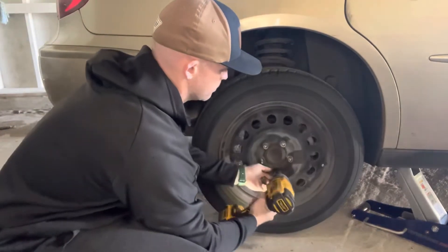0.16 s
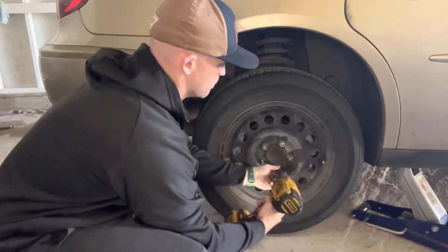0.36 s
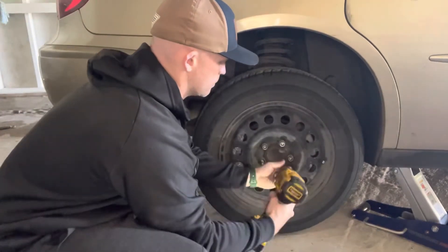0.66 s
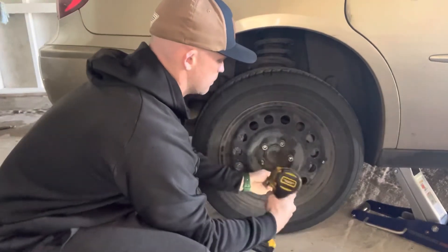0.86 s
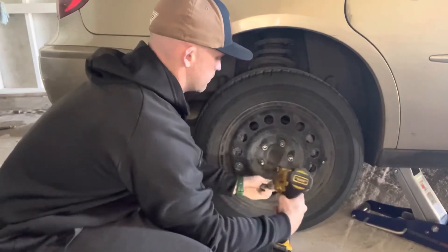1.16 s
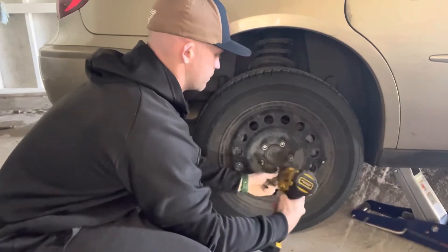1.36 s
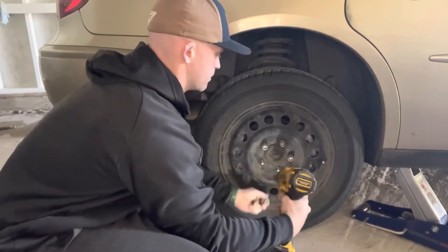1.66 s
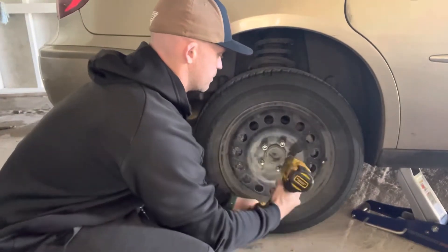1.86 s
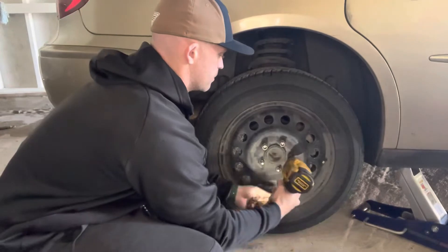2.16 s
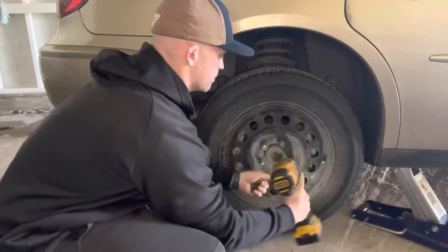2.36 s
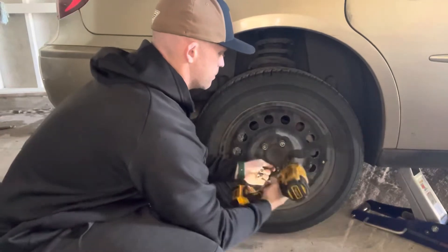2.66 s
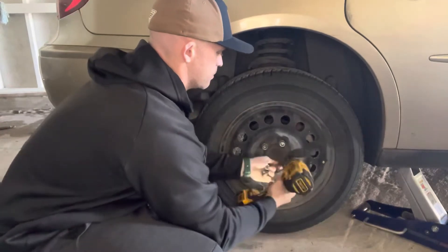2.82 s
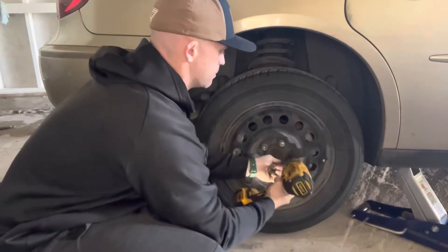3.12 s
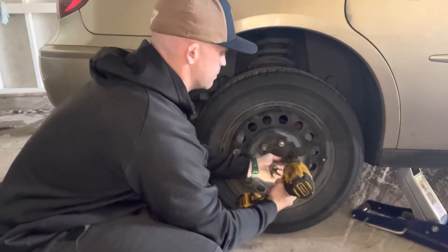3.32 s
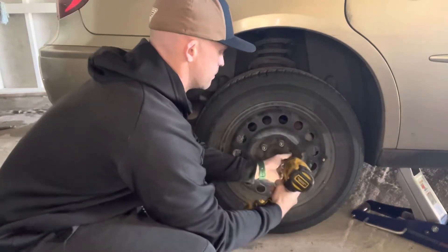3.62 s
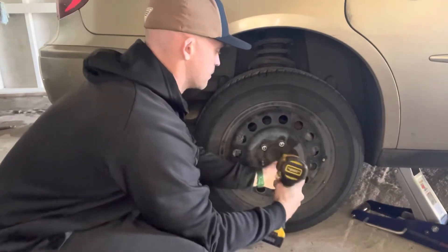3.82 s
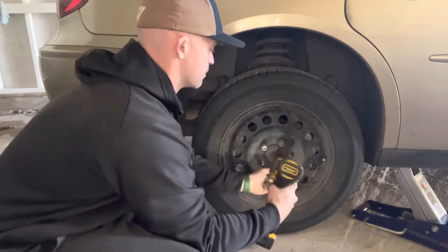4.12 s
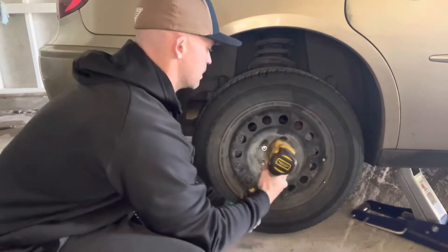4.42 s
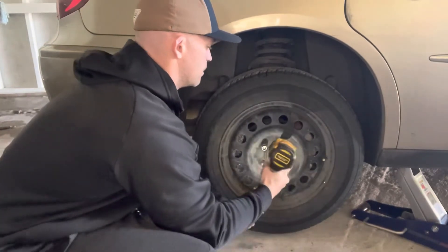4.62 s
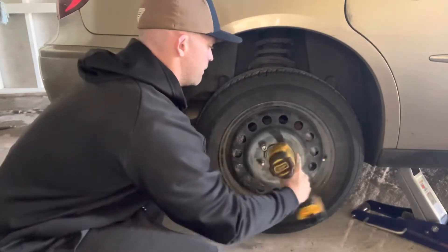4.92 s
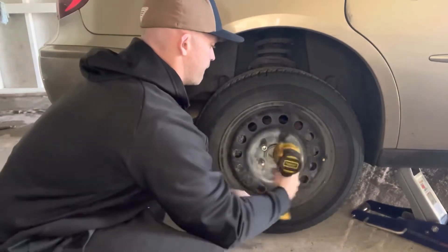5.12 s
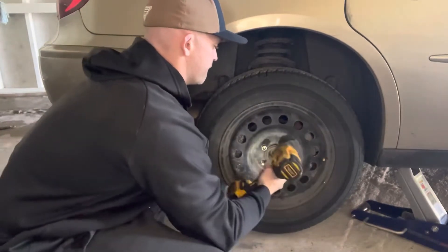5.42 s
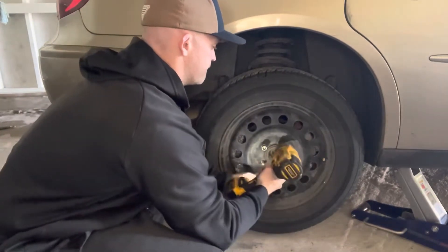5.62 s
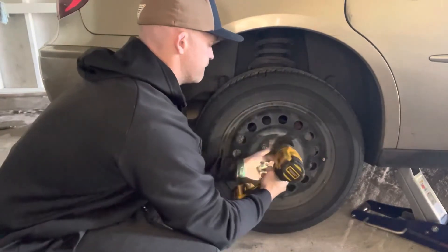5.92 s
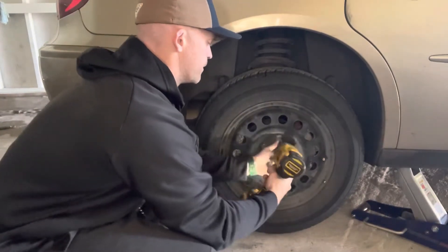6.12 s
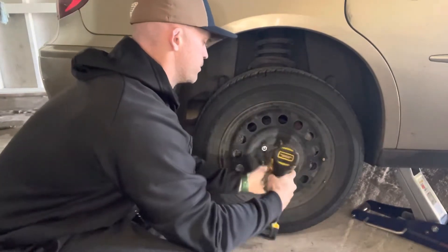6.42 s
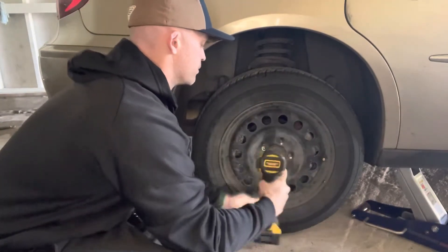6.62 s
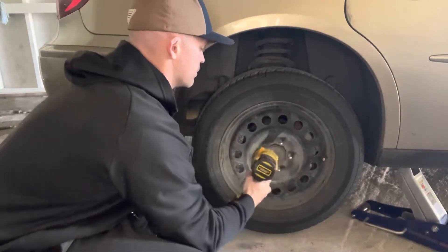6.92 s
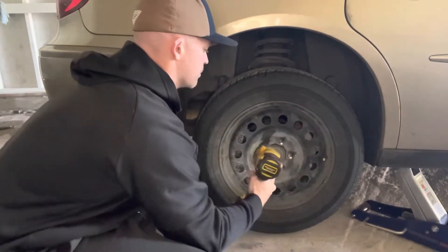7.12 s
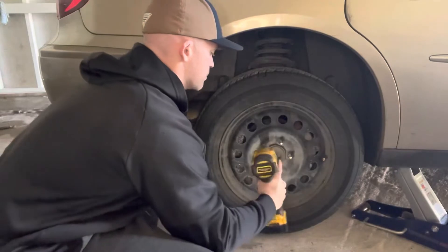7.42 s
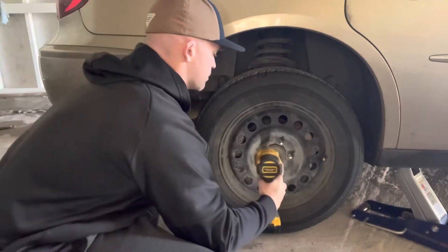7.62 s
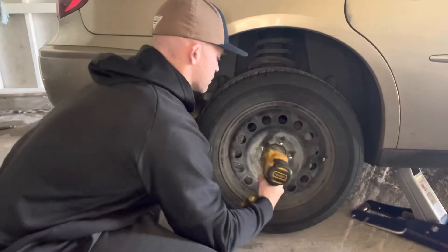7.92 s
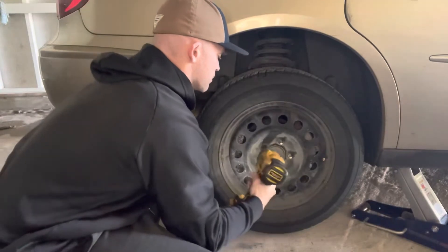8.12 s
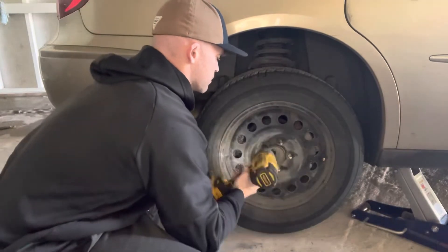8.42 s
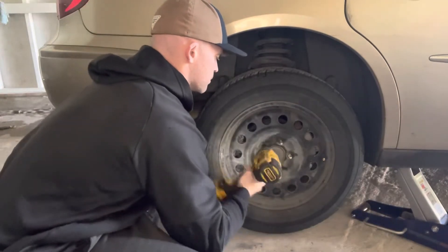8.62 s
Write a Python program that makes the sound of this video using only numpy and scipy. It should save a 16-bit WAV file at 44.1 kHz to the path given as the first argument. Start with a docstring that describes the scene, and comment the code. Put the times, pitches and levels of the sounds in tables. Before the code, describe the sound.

A freed nut rattles in a spinning socket as the motor whines down, then two hammering impact-wrench bursts break up clinks and knocks on a steel wheel.

```python
"""A freed nut rattles in a spinning socket, then the motor whines down: a cordless impact wrench in an open garage.
Nuts clink and the socket knocks on a steel car wheel; two bursts of hammer blows each spin another nut free.
Noise bursts make the contacts, damped sines the ringing steel, speed-driven noise and tones the motor.
Hands rub, scrapes and squeaks fill the pauses; a distant engine hums over low rumble and still air."""
import sys
import numpy as np
from scipy import signal
from scipy.fft import rfft, irfft, next_fast_len
from scipy.io import wavfile

SR = 44100
rng = np.random.default_rng(int(sys.argv[2]) if len(sys.argv) > 2 else 0)


def waveform_to_disk(signal):
    """Save audio, clipped to [-1, 1], as 16-bit WAV at the path in sys.argv[1]."""
    frames = np.transpose(np.atleast_2d(signal))
    scaled = np.clip(frames, -1, 1) * 32767
    samples = np.round(scaled).astype(np.int16)
    wavfile.write(sys.argv[1], SR, samples)


N = 386757
TIME = np.arange(N) / SR

# All levels are relative: filters, layer gains and echoes follow. Spectra: freq_hz, density_db_per_hz

# trigger pulls: pulled_s, nut_free_s, released_s, motor_stopped_s
TRIGGER_RUNS = [(-.7, -.2, .21, .58), (2.79, 3.15, 3.5, 3.85), (5.305, 5.67, 5.99, 6.33)]
# speeds as shares of full speed; run-up is a time constant
LOADED_SPEED, START_S, RUN_UP_S = 0.51, 0.028, .075

# spinning nut: spectrum
SPIN_SPECTRUM = [(100, 6), (200, 3), (420, 0), (520, 1), (720, 3.5), (950, 1), (1450, -3), (2200, -4.5),
                 (2800, -4), (3500, -10.5), (6600, 0.5), (8200, -8), (10500, -7), (13000, -7.5),
                 (14400, -16), (16000, -31.5)]
# tool housing and socket resonances: freq_hz, width_hz, level_db
HOUSING_MODES = [(724, 22, 0), (1080, 140, -10.5), (1450, 61, 0.5), (1880, 35, -9.5), (2525, 100, -1.5),
                 (3440, 45, -7), (4150, 240, -0.5), (5540, 240, -14), (6910, 180, -8.5)]
# levels at full speed; powers of speed that amplitude follows
RATTLE_DB, RATTLE_POWER = -31, 4.1
HISS_DB, HISS_POWER = -35, 2.07
RATTLE_FADE_DB_PER_S = 24.5  # the nut runs off its thread

# gear and fan whirr: spectrum
GEAR_SPECTRUM = [(200, -15.5), (700, -13.5), (1400, -8), (2200, -6.5), (2900, -1), (3500, 0), (4300, -9),
                 (6000, -9), (8000, -15), (11000, -19), (15000, -42)]
GEARS_DB, GEARS_POWER = -37.5, .95
# gear whine overtones: multiple, level_db
WHINE_OVERTONES = [(1, -8), (2, -2), (3, -2.5), (4, -1)]
MESH_HZ, MESH_JITTER_HZ = 1399, 20  # tooth rate at full speed, and its unsteadiness
WHINE_DB, WHINE_POWER = -41.5, .85  # overtone k follows speed to k times this power

# distant engine: time_s, level_db
ENGINE_LEVEL = [(0.0, -56), (1.45, -60), (1.7, -73.5), (2.05, -61.5), (2.49, -62), (2.71, -52.5),
                (3.3, -51), (3.76, -58), (4.78, -42), (5.89, -47.5), (6.32, -43), (6.94, -47.5),
                (7.45, -39), (7.64, -47), (7.84, -46.5), (8.04, -40), (8.77, -33.5)]
ENGINE_HZ, ENGINE_HZ_PER_DB = 83.2, 0.35  # at mean level; faster when louder
# low rumble: spectrum
RUMBLE_SPECTRUM = [(20, -13), (38, -0.5), (55, 15), (75, 13.5), (110, 5), (160, -12.5), (250, -12),
                   (500, -59.5)]
# at rest, with tool at full speed, relative to hand rubbing, relative to engine
RUMBLE_REST_DB, RUMBLE_TOOL_DB, RUMBLE_MOVE_DB, RUMBLE_ENGINE_DB = -61, -42.5, 10, -2.5
RUMBLE_LUMPY_DB = 3
# still air: spectrum
AIR_SPECTRUM = [(88, -33), (150, -1.5), (254, -11.5), (1560, -30.5), (2500, -32), (5570, -43.5),
                (8230, -48.5), (12700, -46.5), (16000, -63)]
AIR_DB = -64.5

# hands shifting the tool and picking out nuts: start_s, end_s, level_db
HAND_MOVES = [(1.08, 1.15, -76), (1.42, 1.52, -67), (1.95, 2.35, -62.5), (2.55, 2.76, -47.5),
              (3.85, 4.05, -64), (4.55, 4.83, -61), (4.98, 5.1, -51.5), (5.17, 5.27, -51), (6.28, 6.4, -66),
              (7.45, 7.6, -65.5), (7.72, 7.77, -54.5), (8.08, 8.77, -53.5)]
MOVE_FADE_S, RESTING_DB = 0.11, -75
# cloth and fingers: spectrum
CLOTH_SPECTRUM = [(200, -3.5), (700, 11), (1200, 2), (2200, -0.5), (3500, -4.5), (6000, -19), (8000, -22),
                  (12500, -20.5), (15000, -39.5)]
TAP_COUNT, TAP_DB = 110, -4  # socket taps in the whole scene; level relative to handling

# freed nut clinking in socket or hand: time_s, level_db
NUT_CLINKS = [(0.0287, -22.5), (0.1005, -22.5), (0.2837, -21.5), (0.3366, -22), (0.527, -40), (0.792, -63),
              (1.819, -60), (1.869, -47), (1.903, -34), (2.009, -49), (2.284, -37), (2.361, -48),
              (2.427, -49.5), (2.546, -31.5), (2.64, -33.5), (3.5508, -18.5), (3.5808, -17), (3.6538, -28),
              (3.666, -24), (3.7697, -41), (3.859, -40), (4.8542, -37), (5.7162, -24), (6.0477, -17.5),
              (6.053, -31), (6.063, -34), (6.1483, -25.5), (6.174, -32), (6.202, -34), (6.268, -43),
              (6.42, -59), (8.084, -45.5), (8.214, -39.5), (8.739, -16.5)]
# clink contact: spectrum
CLINK_SPECTRUM = [(600, -11), (2000, -8), (4500, -5.5), (6500, -9.5), (8000, -8), (10200, -3.5),
                  (12500, -16), (15500, -16.5)]
# loose nut modes: freq_hz, level_db, t60_s
NUT_MODES = [(9790, 1.5, 0.045), (10200, -5.5, 0.033), (11000, -4, 0.034), (11450, -6.5, 0.12),
             (13100, -7, 0.061)]

# socket and nuts on wheel: time_s, clack_db, thud_db, wheel_ring_db, steel_db
WHEEL_KNOCKS = [(0.183, -26, -41.5, -30, -37), (0.625, -48, -60, -71, -60),
                (0.6622, -48.5, -71, -74, -59.5), (1.085, -58, -70, -75, -72), (1.125, -59, -72, -70, -81),
                (1.3123, -51, -72, -72, -50), (1.3687, -46.5, -66, -63, -59),
                (1.6909, -70, -77, -74, -47.5), (1.8943, -23, -35, -21, -38),
                (1.9989, -34.5, -40, -34, -48.5), (2.116, -32, -38, -30, -44.5),
                (2.2822, -43, -48.5, -35.5, -44), (2.3395, -34, -43.5, -41, -48),
                (2.356, -31.5, -39, -36, -35.5), (2.5414, -32.5, -34, -39.5, -34),
                (2.5715, -26.5, -42, -46, -42), (2.595, -50, -34, -50, -61),
                (2.639, -30.5, -37, -47, -41.5), (2.712, -56, -46.5, -45, -58),
                (2.7437, -43.5, -54, -59, -50.5), (3.8815, -36.5, -70, -65.5, -45.5),
                (3.9484, -41.5, -53.5, -53, -53), (4.5687, -29.5, -45, -34.5, -52.5),
                (4.6034, -31, -42, -30.5, -48.5), (4.8718, -25, -48.5, -50, -37.5),
                (4.8863, -25, -44, -40.5, -31.5), (4.929, -43, -44, -44.5, -54),
                (5.014, -36, -48.5, -40.5, -43.5), (5.0978, -45, -43.5, -46, -54.5),
                (5.146, -36, -28.5, -31, -39), (5.182, -45, -42, -53, -50), (5.204, -54, -38.5, -54, -56),
                (5.2933, -35.5, -47.5, -53, -34.5), (6.335, -48, -75, -66, -62.5),
                (6.8425, -21.5, -44.5, -21, -32.5), (6.851, -36.5, -41, -30, -52),
                (7.092, -31.5, -44, -37, -46), (7.3771, -44, -45.5, -46.5, -69),
                (7.688, -54, -51.5, -57, -66), (7.7598, -36.5, -43, -36.5, -60),
                (8.048, -55, -46.5, -52, -70), (8.113, -25.5, -42.5, -39.5, -33.5),
                (8.2107, -37.5, -36, -36, -42), (8.2623, -43.5, -46, -51, -59),
                (8.3292, -45, -53, -56, -67), (8.346, -42, -55.5, -55, -68), (8.364, -50, -56.5, -48, -68),
                (8.3945, -41.5, -53, -57, -74), (8.412, -52.5, -61, -58.5, -76),
                (8.5277, -47, -47, -59, -56), (8.692, -43, -40.5, -53, -56), (8.7203, -42, -52, -58, -51),
                (8.7396, -32, -39.5, -32.5, -28)]
KNOCK_RISE_S = .0018
# tick grows faster than clank, equals it at this steel level: harder is brighter
TICK_GROWTH, TICK_EVEN_DB = 1.28, -19
# knock clack, also light taps: spectrum
CLACK_SPECTRUM = [(400, -12.5), (800, -2), (1200, -1), (1600, -4.5), (2050, 1), (2700, -3), (4500, -22),
                  (9000, -38.5), (15000, -60.5)]
# steel socket struck off the nut: spectrum
CLANK_SPECTRUM = [(1500, -26), (2700, 3.5), (3600, 1), (5000, -4), (6600, -4), (8000, -8), (12000, -26.5),
                  (15000, -48.5)]
# bright steel tick: spectrum
TICK_SPECTRUM = [(4000, -19.5), (6500, -4), (8000, -2), (10000, -5), (13000, -14), (14300, -14),
                 (15800, -30)]
# tyre and tool body thud: spectrum
THUD_SPECTRUM = [(35, -33), (60, 5.5), (130, 2.5), (200, -1), (280, -5), (420, -2.5), (700, -17.5),
                 (1500, -44.5)]
# dense low wheel-disc modes: spectrum
DISC_SPECTRUM = [(300, -21.5), (450, -6.5), (600, -6), (720, 5), (820, -10), (950, -27.5), (1400, -18.5),
                 (3000, -45.5)]
# wheel with socket on it: freq_hz, level_db, t60_s
WHEEL_MODES = [(365, -13, .08), (415, -10, .09), (490, -12, .07), (602, -5, .17), (692, -1, .06),
               (730, 0, .05), (815, -4, .05), (1045, -12, .06), (1151, -8, .08), (1236, -11, .06),
               (1515, -8, .09), (1860, -11, .05), (2000, -4, .06), (2137, -6, .07), (2682, -11, .06),
               (3040, -12, .04), (4118, -9, .08)]
SEAT_DETUNE = .012  # pitch share by which the socket seat shifts modes, blow to blow
# free socket modes: freq_hz, level_db, t60_s
SOCKET_MODES = [(3480, 0, 1.3), (2510, -4, .3), (6430, -5, .2)]
# free socket struck and ringing on: time_s, level_db
SOCKET_STRIKES = [(0.34, -58), (6.844, -58), (7.092, -62), (8.114, -55)]

# faint squeaks: start_s, length_s, start_hz, end_hz, level_db
SQUEAK_GLIDES = [(.88, .18, 3750, 3830, -76), (1.5, .25, 1200, 1190, -74), (4.19, .1, 2500, 2180, -69),
                 (4.26, .12, 4550, 3750, -74), (4.34, .2, 3500, 3100, -76)]
SQUEAK_JITTER = .02  # share of pitch

# arm and tool against tyre: time_s, level_db
TYRE_BUMPS = [(.955, -54), (1.09, -55), (1.172, -54), (1.37, -47), (1.432, -52.5), (3.37, -36)]
# tyre bump: spectrum
BUMP_SPECTRUM = [(40, -15.5), (90, 8.5), (170, -2.5), (240, -17.5), (400, -21.5), (1000, -53)]

# sleeve brushing past: start_s, end_s, level_db
SLEEVE_BRUSHES = [(1.11, 1.15, -71.5), (2.24, 2.28, -76), (6.64, 6.72, -76)]
# sleeve hiss: spectrum
BRUSH_SPECTRUM = [(800, -16), (3000, 4), (5500, 1), (8000, -6), (11000, 1), (13000, 0), (15500, -21)]
BRUSH_FADE_S = .08

# socket scraping over wheel and nut: start_s, end_s, level_db
SOCKET_SCRAPES = [(2.6, 2.66, -60), (2.8, 2.83, -41), (5.33, 5.355, -39.5), (7.7, 7.76, -64),
                  (8.13, 8.17, -45.5), (8.23, 8.29, -64.5), (8.335, 8.43, -58.5), (8.45, 8.52, -62)]
# stick-slip scrape: spectrum
SCRAPE_SPECTRUM = [(300, -12), (800, 3.5), (1600, 2), (3500, 3.5), (5200, -2.5), (7000, -22.5),
                   (12000, -30.5), (15000, -41)]
SLIPS_PER_S, SCRAPE_FADE_S = 170, 0.037

# hammer blows, glancing and catching on a tight nut: time_s, crack_db, clatter_db, wheel_ring_db
HAMMER_BLOWS = [(2.832, 1, 2.5, -18.5), (2.857, -9, -1, -28.5), (2.869, -2.5, -8.5, -24.5),
                (2.881, -2.5, -6, -10.5), (2.905, -4, -4, -23.5), (2.914, -3, -5, -23.5),
                (2.932, -7.5, -5, -28.5), (2.941, -1.5, -3, -29), (2.9693, -6.5, -2, -40),
                (2.993, -4, 1.5, -25), (3.018, -1, -3.5, -10.5), (3.043, -2.5, -4, -19),
                (3.067, -0.5, -3, -10.5), (3.092, -3, -9.5, -28), (3.117, -3, -14, -33),
                (5.357, -4, 0, -19.5), (5.382, -6.5, 4.5, -28.5), (5.392, -3, -10, -20.5),
                (5.403, -9.5, -2.5, -7.5), (5.428, -6.5, 4, -21.5), (5.437, -0.5, 7, -18.5),
                (5.463, -6.5, -0.5, -39.5), (5.4886, -4, -4, -30.5), (5.514, -6.5, -0.5, -20),
                (5.539, -1, 2, -14), (5.563, -4.5, -2, -9), (5.589, -2.5, -9, -30), (5.614, -8, 1, -13),
                (5.641, -7, 2, -18)]
# hammer crack: spectrum
CRACK_SPECTRUM = [(59, -35.5), (100, -8), (283, -18), (406, -12), (452, -17), (648, -15), (705, -4.5),
                  (930, -22), (1130, -15), (1650, -19.5), (1950, -9), (4020, -12.5), (8110, -16),
                  (12700, -21), (16000, -28.5)]
# dense wheel and tool modes under the hammer: spectrum
CLATTER_SPECTRUM = [(200, -13.5), (420, -1), (700, -3), (1200, 6), (2000, 3.5), (3000, 6), (4200, -3.5),
                    (6000, -16), (8000, -18), (14000, -33.5)]
# anvil and socket under the hammer: freq_hz, level_db, t60_s
ANVIL_MODES = [(2682, -6, .08), (3040, -1, .05), (3190, -4, .06), (4120, 0, .08)]
ANVIL_DB = -22.5

# garage decay: freq_hz, t60_s
GARAGE_DECAY = [(150, 0.55), (400, 0.52), (1000, 0.46), (2800, 0.31), (7000, 0.25), (14000, 0.18)]
# microphone pair: freq_hz, left_lead_rad
PORT_LEAD = [(50, 0), (600, -.6), (1460, -.7), (2400, -2.6), (3100, -2.6), (4100, -3.8), (6500, -4.7),
             (7100, -3.1), (8500, -2.8), (11000, -.1), (12600, .2), (14200, 2.9)]
# microphone pair: freq_hz, left_minus_right_db
PORT_LEVEL = [(60, 0), (200, -1.5), (400, -0.5), (700, -4), (1300, -2), (2400, -1.5), (4400, -5.5),
              (8000, -2), (14000, 0.5)]
SHIFTS_PER_S = 2  # body and tool shift the echo pattern
CUTOFF_HZ = 16100


def from_db(db):
    """Decibels to amplitude gain."""
    return 10 ** (np.asarray(db) / 20)


def rms_one(x):
    """Scale to unit rms."""
    return x / np.sqrt(np.mean(x ** 2) + 1e-20)


def in_time(rows):
    """Interpolate each column of a curve, sample by sample."""
    s, *columns = np.transpose(rows)
    return [np.interp(TIME, s, c) for c in columns]


def at_hz(points, hz):
    """Read a table on a log-frequency axis."""
    f, value = np.transpose(points)
    return np.interp(np.log(np.maximum(hz, 1)), np.log(f), value)


def drift(knots_per_s):
    """Random curve of unit rms through independent knots."""
    knots = rng.standard_normal(N // 20)
    return rms_one(np.interp(TIME * knots_per_s, np.arange(len(knots)), knots))


def colour(x, spectrum, size=4096):
    """Minimum-phase filter with the given spectrum; white noise keeps its power."""
    gain = rms_one(from_db(at_hz(spectrum, np.fft.rfftfreq(size, 1 / SR))))
    # fold the cepstrum to make the filter causal
    cepstrum = irfft(np.log(gain))
    cepstrum[1:size // 2] *= 2
    cepstrum[size // 2 + 1:] = 0
    impulse = irfft(np.exp(rfft(cepstrum)))
    return signal.oaconvolve(x, impulse)[:N]


def noise(spectrum):
    """Steady coloured noise, rms near 1."""
    return colour(rng.standard_normal(N), spectrum)


def clicks(times, gains):
    """One impulse at each time."""
    out = np.zeros(N)
    index = np.clip(np.round(times * SR).astype(int), 0, N - 1)
    np.add.at(out, index, gains)
    return out


def contacts(times, db, rise, t60, hold=0):
    """Steel chatter or dull contact: at each time a noise burst swells, holds and dies."""
    t = TIME[:SR // 4]
    swell = 1 - np.exp(-(t / rise) ** 2)
    shape = swell * from_db(-60 * np.maximum(t - hold, 0) / t60)
    envelope = signal.oaconvolve(clicks(times, from_db(db)), shape / shape.max())[:N]
    return envelope * rng.standard_normal(N)


def ringing(modes, times, db, scatter_db, tilt_db, detune=0):
    """Each blow rings damped modes with random strength and detuning; tilt is per octave away from 700 Hz."""
    hz, level_db, t60 = np.transpose(modes)
    t = TIME[:int(SR * min(1.2 * t60.max(), 1))]
    out = np.zeros(N + 2 * SR)
    level_db = level_db + tilt_db * np.abs(np.log2(hz / 700))
    decays = from_db(level_db[:, None] - 60 * t / t60[:, None])
    decays = decays * (1 - np.exp(-t / 0.0013))  # vibration spreads through the steel
    for s, blow_db in zip(times, db):
        signs = rng.choice([-1, 1], len(hz))
        strengths = signs * from_db(blow_db + scatter_db * rng.standard_normal(len(hz)))
        pitches = hz * (1 + detune * rng.standard_normal(len(hz)))
        start = max(round(s * SR), 0)
        out[start:start + len(t)] += strengths @ (decays * np.sin(2 * np.pi * pitches[:, None] * t))
    return out[:N]


def resonate(x, modes, boost_db):
    """Add resonant peaks to the sound passing through; rms 1."""
    peaks = 0
    for hz, width, db in modes:
        b, a = signal.iirpeak(hz, hz / width, fs=SR)
        peaks = peaks + from_db(db) * signal.lfilter(b, a, x)
    return rms_one(x + from_db(boost_db) * peaks)


def swells(rows, fade_s):
    """Gain of strokes that swell, hold and fade."""
    out = 0
    for start, end, db in rows:
        ramp = np.interp(TIME, [start - fade_s, start, end, end + fade_s], [0, 1, 1, 0])
        out = out + from_db(db) * ramp ** 2
    return out


def speed(pulled, free, released, stopped):
    """Motor starts, labours under load, runs up when the nut frees, and is braked evenly by friction."""
    load = (1 - LOADED_SPEED) * np.exp(-np.maximum(TIME - free, 0) / RUN_UP_S)
    drive = np.interp(TIME, [pulled, pulled + START_S, released, stopped], [0, 1, 1, 0])
    return (1 - load) * drive


def motor_speed():
    """Share of full speed over all trigger pulls."""
    return sum(speed(*run) for run in TRIGGER_RUNS)


def handling_level():
    """Gain of rubbing hands and cloth."""
    return from_db(RESTING_DB) + swells(HAND_MOVES, MOVE_FADE_S)


def spinning():
    """The loose nut rattles in dense tiny impacts that bunch about 31 times a second."""
    turn = np.cumsum(31 * (1 + 0.14 * drift(10))) / SR
    wobble = from_db(2.0 * np.sin(2 * np.pi * turn) + 2.1 * drift(350))
    grains = rms_one((rng.random(N) < 9000 / SR) * rng.standard_normal(N))
    impacts = resonate(colour(grains * wobble, SPIN_SPECTRUM), HOUSING_MODES, boost_db=1)
    rattle = rms_one(signal.sosfilt(signal.butter(2, 3200, fs=SR, output="sos"), impacts))
    hiss = rms_one(signal.sosfilt(signal.butter(2, 3200, "high", fs=SR, output="sos"), impacts))
    out = 0
    for pulled, free, released, stopped in TRIGGER_RUNS:
        spin = speed(pulled, free, released, stopped) * (TIME > free)
        rattle_db = RATTLE_DB - RATTLE_FADE_DB_PER_S * np.maximum(TIME - free, 0)
        out = out + from_db(rattle_db) * spin ** RATTLE_POWER * rattle
        out = out - from_db(HISS_DB) * spin ** HISS_POWER * hiss
    return out


def motor():
    """Gears and fan whirr; the teeth add a rough whine whose pitch and level follow speed."""
    pace = motor_speed()
    flutter = from_db(2 * drift(150) + 1.5 * drift(45))
    whirr = resonate(noise(GEAR_SPECTRUM) * flutter, HOUSING_MODES, boost_db=1.0)
    mesh_hz = MESH_HZ * pace + MESH_JITTER_HZ * (drift(260) + .6 * drift(25))
    phase = 2 * np.pi * np.cumsum(mesh_hz) / SR
    whine = 0
    for k, db in WHINE_OVERTONES:
        level = from_db(db + 3 * drift(180)) * pace ** (k * WHINE_POWER)
        whine = whine + level * np.sin(k * phase)
    return from_db(GEARS_DB) * pace ** GEARS_POWER * whirr + from_db(WHINE_DB) * whine


def background():
    """Engine hum with its octave, lumpy low rumble that swells with the work, and still air."""
    hum_db, = in_time(ENGINE_LEVEL)
    engine_hz = ENGINE_HZ + ENGINE_HZ_PER_DB * (hum_db - hum_db.mean())
    phase = 2 * np.pi * np.cumsum(engine_hz) / SR
    octave = from_db(-16.0 + 0.91 * drift(3.4)) * np.sin(2 * phase)
    hum = from_db(hum_db + 4.5 + 1.1 * drift(7.7)) * (np.sin(phase) + octave)
    width = from_db(-9) * noise(RUMBLE_SPECTRUM) * [[1], [-1]]  # opposite sign at the two ports
    causes = [from_db(RUMBLE_REST_DB), from_db(RUMBLE_TOOL_DB) * motor_speed() ** 2,
              from_db(RUMBLE_MOVE_DB) * handling_level(), from_db(RUMBLE_ENGINE_DB + hum_db)]
    level = np.sqrt(sum(cause ** 2 for cause in causes)) * from_db(RUMBLE_LUMPY_DB * drift(12))
    rumble = level * (noise(RUMBLE_SPECTRUM) + width)
    air = from_db(AIR_DB) * np.array([noise(AIR_SPECTRUM), noise(AIR_SPECTRUM)])
    return hum + rumble + air


def rustling():
    """Cloth, fingers and socket rub in uneven slips, with light steel taps among them."""
    slips = rms_one(rng.standard_normal(N) * from_db(4.5 * drift(110) + 3 * drift(25)))
    tap_s = rng.uniform(0, N / SR, TAP_COUNT)
    tap_db = TAP_DB + 3 * rng.standard_normal(TAP_COUNT)
    taps = contacts(tap_s, tap_db, rise=0.0013, t60=0.028)
    rubbing = from_db(-5.0) * colour(slips, CLOTH_SPECTRUM)
    return handling_level() * (rubbing + colour(taps, CLACK_SPECTRUM))


def clinking():
    """Small bright contacts of nut on steel or in the hand; the nut rings briefly."""
    s, db = np.transpose(NUT_CLINKS)
    ring = from_db(-13) * ringing(NUT_MODES, s, db, scatter_db=6.5, tilt_db=-1.5)
    contact = from_db(-2.5) * colour(contacts(s, db, rise=0.00023, t60=0.024), CLINK_SPECTRUM)
    return contact + ring


def knocking():
    """Steel clack, clank and tick, ringing wheel and socket, and a thud of tyre and tool body."""
    heard, clack_db, thud_db, ring_db, clank_db = np.transpose(WHEEL_KNOCKS)
    s = heard - KNOCK_RISE_S / 2
    tick_db = TICK_EVEN_DB + TICK_GROWTH * (clank_db - TICK_EVEN_DB)
    clack = from_db(-3.0) * colour(contacts(s, clack_db, rise=KNOCK_RISE_S, t60=.045), CLACK_SPECTRUM)
    clank = from_db(6.0) * colour(contacts(s, clank_db, rise=KNOCK_RISE_S, t60=0.03), CLANK_SPECTRUM)
    tick = from_db(4.5) * colour(contacts(s, tick_db, rise=0.00097, t60=0.019), TICK_SPECTRUM)
    thud = from_db(3.0) * colour(contacts(s, thud_db, rise=0.0028, t60=0.17), THUD_SPECTRUM)
    disc = from_db(-3) * colour(contacts(s + 0.0016, ring_db, rise=0.0036, t60=0.063), DISC_SPECTRUM)
    wheel = from_db(-3.5) * ringing(WHEEL_MODES, s + .002, ring_db, scatter_db=-1.0, tilt_db=-4.0,
                                    detune=SEAT_DETUNE)
    socket = ringing(SOCKET_MODES, *np.transpose(SOCKET_STRIKES), scatter_db=1, tilt_db=0)
    return clack + clank + tick + thud + disc + wheel + socket


def squeaking():
    """Thin wavering tones swell, glide and fade."""
    out = 0
    waver = 1 + SQUEAK_JITTER * drift(220)
    for s, length, start_hz, end_hz, db in SQUEAK_GLIDES:
        share = np.clip((TIME - s) / length, 0, 1)
        pitch_hz = (start_hz + share * (end_hz - start_hz)) * waver
        phase = 2 * np.pi * np.cumsum(pitch_hz) / SR
        out = out + from_db(db) * np.sin(np.pi * share) * np.sin(phase)
    return out


def bumping():
    """Dull, short noise bursts of bumps on rubber."""
    return colour(contacts(*np.transpose(TYRE_BUMPS), rise=0.0034, t60=0.12), BUMP_SPECTRUM)


def brushing():
    """Smooth fabric slides with a faint hiss."""
    return swells(SLEEVE_BRUSHES, BRUSH_FADE_S) * noise(BRUSH_SPECTRUM)


def scraping():
    """Steel sticks and slips on steel in quick uneven catches."""
    s = rng.uniform(0, N / SR, int(SLIPS_PER_S * N / SR))
    catches = contacts(s, 4 * rng.standard_normal(len(s)), rise=0.00072, t60=0.016)
    return swells(SOCKET_SCRAPES, SCRAPE_FADE_S) * rms_one(colour(catches, SCRAPE_SPECTRUM))


def hammering():
    """Blows crack through anvil and socket and ring the wheel; dense modes clatter unevenly."""
    s, crack_db, clatter_db, ring_db = np.transpose(HAMMER_BLOWS)
    chatter = contacts(s, crack_db, rise=.0009, t60=.009, hold=.0036)
    crack = from_db(-6.0) * colour(chatter, CRACK_SPECTRUM)
    uneven = contacts(s, clatter_db, rise=.002, t60=.052) * from_db(3 * drift(400))
    clatter = from_db(-23) * colour(uneven, CLATTER_SPECTRUM)
    anvil = from_db(ANVIL_DB) * ringing(ANVIL_MODES, s, clatter_db, scatter_db=3, tilt_db=0, detune=.004)
    disc = from_db(-7) * colour(contacts(s + 0.0015, ring_db, rise=0.0017, t60=0.043), DISC_SPECTRUM)
    wheel = from_db(-10) * ringing(WHEEL_MODES, s + .002, ring_db, scatter_db=3.5, tilt_db=0,
                                   detune=SEAT_DETUNE)
    return crack + clatter + anvil + disc + wheel


def garage_response(size=32768):
    """Diffuse echoes, different at each port, dying sooner in the treble."""
    t, out = TIME[:size], 0
    edges_hz = np.geomspace(40, 18000, 13)
    for low, high in zip(edges_hz, edges_hz[1:]):
        bandpass = signal.butter(2, [low, high], "band", fs=SR, output="sos")
        band = signal.sosfilt(bandpass, rng.standard_normal((3, size)))
        hz = np.sqrt(low * high)
        alike = 1 / (1 + (hz / 290) ** 3)  # long waves reach both ports alike
        pair = np.sqrt(alike) * band[2] + np.sqrt(1 - alike) * band[:2]
        out = out + pair * from_db(-60 * t / at_hz(GARAGE_DECAY, hz))
    out = out * (1 - np.exp(-(t / 0.0037) ** 2))
    return out / np.sqrt(np.sum(out ** 2) / 2)


def place(x, rooms, wet_db):
    """Direct sound reaches two ports out of step; shifting echoes answer; the right mostly hears more."""
    size = next_fast_len(N + SR)
    hz = np.fft.rfftfreq(size, 1 / SR)
    direct = rfft(x, size) * np.array([np.exp(1j * at_hz(PORT_LEAD, hz)), np.ones_like(hz)])
    posture_rad = 2 * drift(SHIFTS_PER_S)
    echoes = 0
    for share, room in zip([np.cos(posture_rad), np.sin(posture_rad)], rooms):
        echoes = echoes + rfft(x * share, size) * rfft(room, size)
    balance = from_db(at_hz(PORT_LEVEL, hz) * [[.5], [-.5]])
    return irfft(balance * (direct + from_db(wet_db) * echoes), size)[:, :N]


def scene():
    """Work at the wheel shares two echo patterns; the background is added without echoes."""
    rooms = garage_response(), garage_response()
    whirr = place(spinning() + motor(), rooms, wet_db=-4.5)
    sharp = place(clinking() + hammering(), rooms, wet_db=-7.5)
    contact = knocking() + bumping() + scraping()
    rubbing = rustling() + brushing() + squeaking()
    handling = place(contact + rubbing, rooms, wet_db=-7)
    return whirr + sharp + handling + background()


def record(dry):
    """The microphone loses the highest treble; loud peaks are rounded and the top is cut steeply."""
    heard = signal.sosfilt(signal.butter(8, 14600, fs=SR, output="sos"), dry)
    rounded = .95 * np.tanh(heard / .95)
    return signal.sosfilt(signal.ellip(10, .1, 80, CUTOFF_HZ, fs=SR, output="sos"), rounded)


dry = scene()
out = record(dry)
waveform_to_disk(out)
```